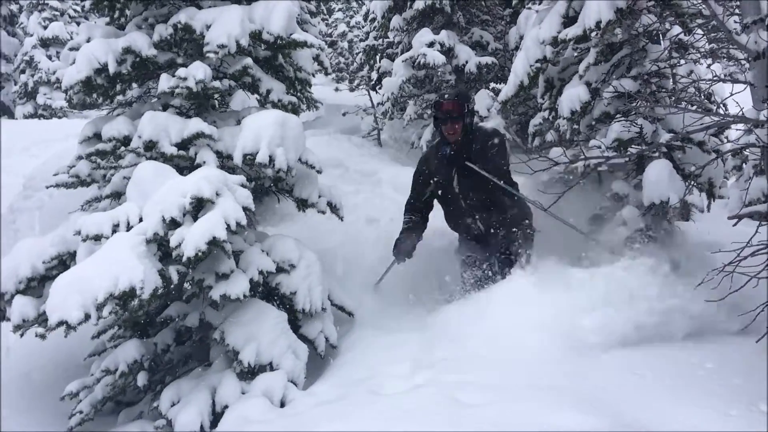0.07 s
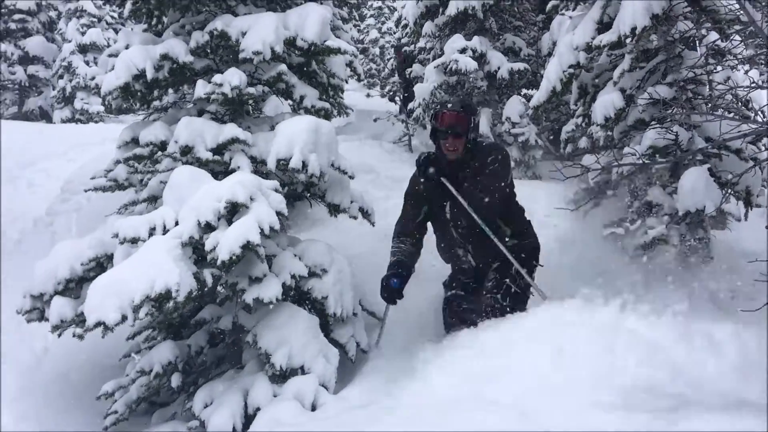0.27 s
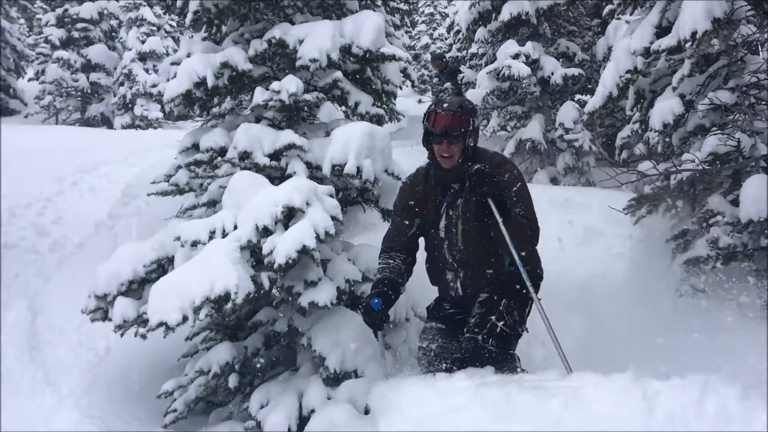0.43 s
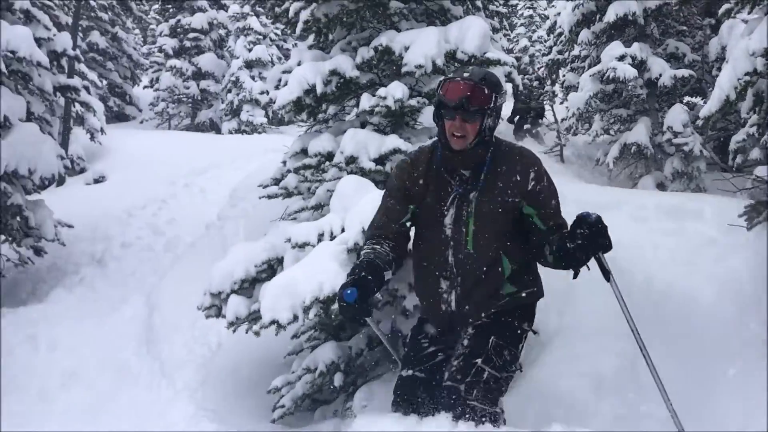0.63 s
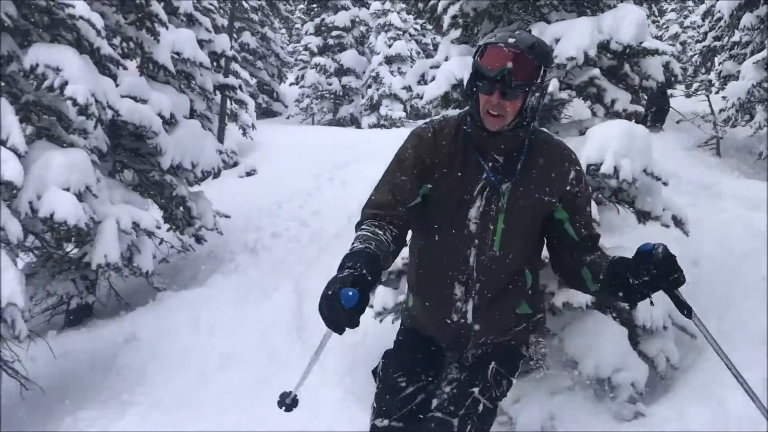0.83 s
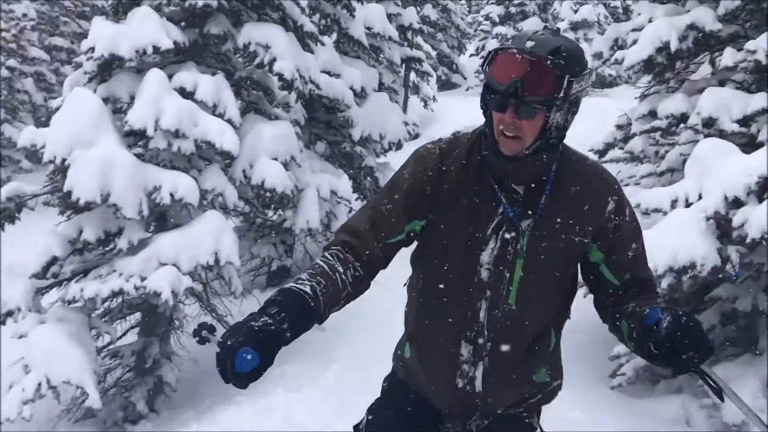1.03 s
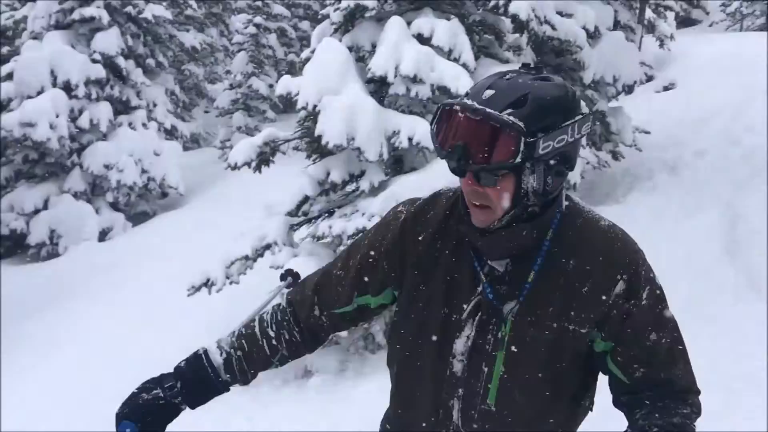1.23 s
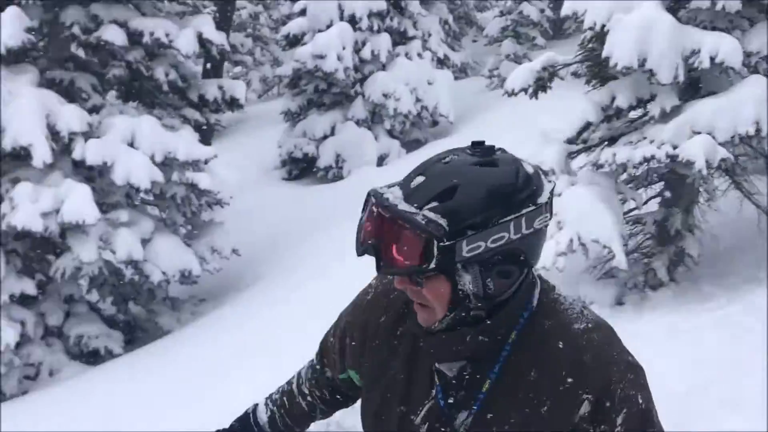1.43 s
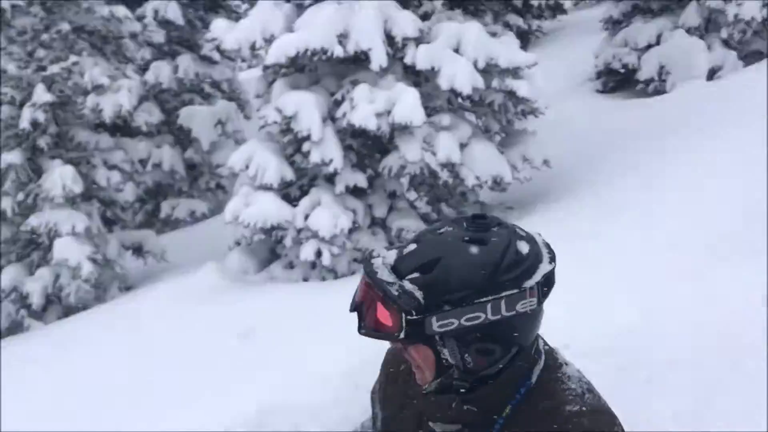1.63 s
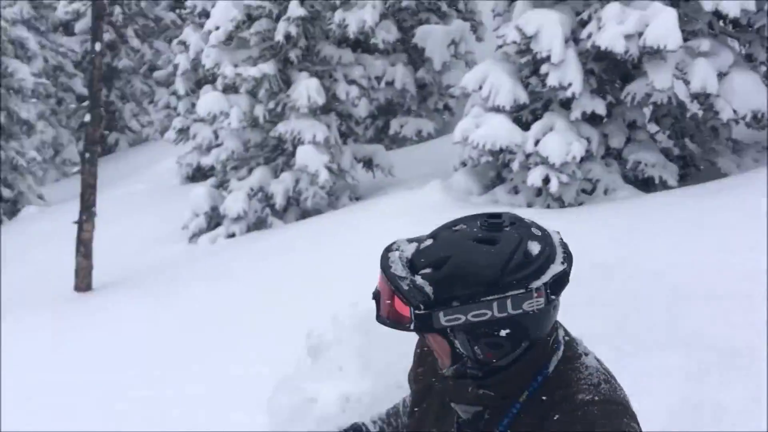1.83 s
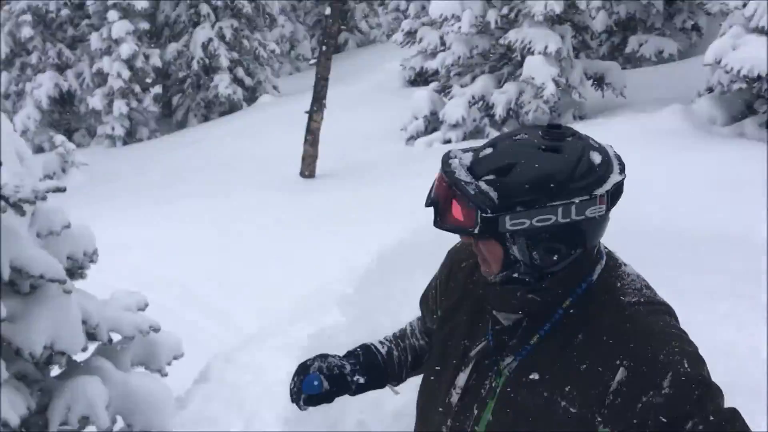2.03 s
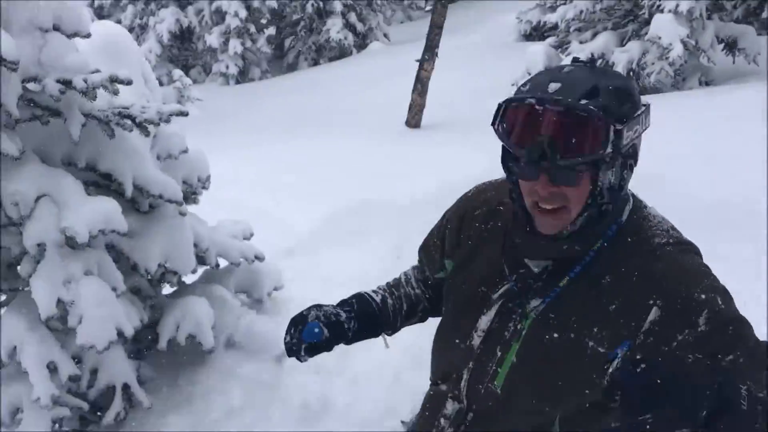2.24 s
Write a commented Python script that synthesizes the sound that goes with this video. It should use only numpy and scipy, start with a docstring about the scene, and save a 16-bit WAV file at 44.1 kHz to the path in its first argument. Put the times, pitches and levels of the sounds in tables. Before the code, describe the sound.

Skis swish and hiss through deep powder close by, with metallic gear clicks and low wind rumble

```python
"""Metal gear clicks, rattles and rings in the first half second, over hissing skis and wind rumble.
A skier then passes close in deep powder: swish, spray, short crunches, cracks and low thumps.
Skis, snow and wind are coloured noise and random grains under level curves; cracks are filtered clicks;
gear, poles and thumps are decaying sines, with noise rattles on the gear. No echoes; both channels alike."""
import sys
import numpy as np
from scipy import signal
from scipy.fft import rfft, irfft
from scipy.io import wavfile
from scipy.ndimage import uniform_filter1d

SR = 44100
rng = np.random.default_rng(int(sys.argv[2]) if len(sys.argv) > 2 else 0)


def generate_wav(signal):
    """Clip the signal to [-1, 1] and save it as 16-bit WAV at the path in sys.argv[1]."""
    frames = np.transpose(np.atleast_2d(signal))
    scaled = np.clip(frames, -1, 1) * 32767
    pcm = np.round(scaled).astype(np.int16)
    wavfile.write(sys.argv[1], SR, pcm)


N = 101429
TIME = np.arange(N) / SR


def from_db(db):
    """Decibels to gain."""
    return 10 ** (np.asarray(db) / 20)


def rms_one(x):
    """Scale to unit power."""
    return x / np.sqrt(np.mean(x ** 2) + 1e-20)


def in_time(rows):
    """Each column of a curve, joined by straight lines."""
    s, *columns = np.transpose(rows)
    return [np.interp(TIME, s, c) for c in columns]


def coloured(x, colour):
    """Filter to a spectrum, log-frequency interpolated and falling steeply outside it; unit power."""
    hz, db = np.transpose(colour)
    log_f = np.log(np.maximum(np.arange(N // 2 + 1) * SR / N, 1))
    below = np.maximum(np.log(hz[0]) - log_f, 0)
    above = np.maximum(log_f - np.log(hz[-1]), 0)
    gain_db = np.interp(log_f, np.log(hz), db) - 20 * (below + above)
    return rms_one(irfft(rfft(x) * from_db(gain_db), N))


def noise(colour):
    """Random noise with a spectrum; unit power."""
    return coloured(rng.standard_normal(N), colour)


def drift(corner_hz):
    """Slow random wander of unit power: white noise rolled off above the corner."""
    f = np.arange(N // 2 + 1) * SR / N
    spectrum = rfft(rng.standard_normal(N)) / (1 + (f / corner_hz) ** 2)
    return rms_one(irfft(spectrum, N))


def grains(per_s, spread_db):
    """Random clicks of either sign, mostly small and a few large."""
    size_db = spread_db * np.minimum(rng.exponential(1, N), 4)
    sizes = from_db(size_db) * rng.choice([-1, 1], N)
    return sizes * (rng.random(N) < per_s / SR)


def evened(x, span_s):
    """Take the slow swings out of a noise, so that a level curve alone sets them."""
    power = uniform_filter1d(x ** 2, max(int(span_s * SR), 2))
    return x / np.sqrt(power + 1e-3)


def band(x, order, centre_hz, width_octaves):
    """Band-pass around a centre, edges held below half the sample rate."""
    edges_hz = centre_hz * 2 ** (width_octaves * np.array([-.5, .5]))
    edges_hz = np.minimum(edges_hz, [SR / np.pi, SR / 2 - 1])
    return signal.sosfilt(signal.butter(order, edges_hz, "band", fs=SR, output="sos"), x + 1e-18)


def modes(table, age):
    """Decaying sines, struck at age zero."""
    return sum(from_db(db - 60 * age / t60) * np.sin(2 * np.pi * hz * age) for hz, db, t60 in table)


# gusts on the microphone: (time [s], level before trim and low-pass [dB])
WIND_GUSTS = [(0.0, -45), (0.02, -51.5), (0.13, -64), (0.15, -52), (0.46, -55.5), (0.79, -49), (0.81, -76),
              (0.84, -48.5), (1.01, -56), (1.11, -39.5), (1.14, -61), (1.17, -47), (1.38, -62.5),
              (1.43, -42.5), (1.55, -57), (1.59, -44), (1.61, -61), (1.67, -45), (1.73, -49.5), (1.81, -32),
              (1.87, -50), (2.02, -40), (2.07, -76), (2.1, -43), (2.15, -55), (2.2, -42), (2.3, -74)]
# wind spectrum: (frequency [Hz], relative level [dB])
WIND_COLOUR = [(22, -30), (36, -5), (48, -5.5), (72, -2), (100, -12), (140, -14.5), (250, -84)]
WIND_TRIM_DB, WIND_TOP_HZ = 1.5, 147


def wind():
    """Gusts buffet the microphone in low, rounded lumps: low-passed noise under a gust curve."""
    gust_db, = in_time(WIND_GUSTS)
    lumps = from_db(gust_db + WIND_TRIM_DB) * evened(noise(WIND_COLOUR), span_s=0.046)
    return signal.sosfilt(signal.butter(3, WIND_TOP_HZ, fs=SR, output="sos"), lumps)


# shivering metal spectrum: (frequency [Hz], relative level [dB])
SHIVER_COLOUR = [(6950, -30), (7150, 0), (7250, -12), (7350, 11), (7600, -30)]
SHIVER_PEAK_S, SHIVER_PEAK_DB, SHIVER_RISE_DB_PER_S, SHIVER_FALL_DB_PER_S = 1.85, -66, 55, 90


def shiver():
    """Bumps set the metal parts shivering: faint narrow-band noise that swells and fades."""
    rise_db = SHIVER_RISE_DB_PER_S * (SHIVER_PEAK_S - TIME)
    fall_db = SHIVER_FALL_DB_PER_S * (TIME - SHIVER_PEAK_S)
    level_db = SHIVER_PEAK_DB - np.maximum(rise_db, fall_db)
    return from_db(level_db) * evened(noise(SHIVER_COLOUR), span_s=0.041)


# knocks on the hollow poles: (time [s], level before mode levels [dB], pitch struck hardest [Hz])
POLE_KNOCKS = [(.1925, -40.5, 2400), (0.2296, -39, 1750), (0.2377, -40.5, 3330)]
# pole modes: (frequency [Hz], relative level [dB], t60 [s])
POLE_MODES = [(1370, -18, 0.034), (1750, -10, 0.025), (2400, 1, 0.02), (3330, -9, 0.055), (3490, -15, 0.06),
              (4370, -6, .016), (5980, -8, .02)]
KNOCK_FALL_DB_PER_OCTAVE = 4   # modes away from the struck pitch answer less


def poles():
    """A short hollow note under some of the taps; where the pole is hit decides which modes it favours."""
    out = np.zeros(N)
    for s, knock_db, struck_hz in POLE_KNOCKS:
        struck = []
        for hz, db, t60 in POLE_MODES:
            loss_db = KNOCK_FALL_DB_PER_OCTAVE * abs(np.log2(hz / struck_hz))
            struck.append((hz, db - loss_db, t60))
        out += from_db(knock_db) * modes(struck, np.maximum(TIME - s, 0))
    return out


# gear knocks: (time [s], snap impulse before band-pass [dB], rattle level [dB], rattle t60 [s],
# ring level before mode levels [dB], time until the ring is damped [s])
GEAR_TAPS = [(0.062, -42, -56, .03, -56, .008), (0.105, -27, -41, 0.021, -43, 0.032),
             (0.1178, -25, -55, 0.013, -46, 0.0087), (0.1917, -34, -45, 0.12, -54.5, 0.044),
             (0.2294, -7, -42, 0.06, -69, 0.015), (.2370, 8.5, -19, 0.026, -45, 0.017),
             (0.2558, 2, -22.5, 0.017, -33, 0.36), (0.3933, -28, -61, 0.027, -52, 0.0088),
             (0.455, -66, -70, .02, -55, 0.087)]
# rattle spectrum: (frequency [Hz], relative level [dB])
RATTLE_COLOUR = [(500, -27), (2000, -15.5), (4000, -10), (5200, -10.5), (6500, -11), (8200, -4.5),
                 (11200, -1), (12400, -6), (13300, -6), (15500, -9), (17000, 0)]
# small metal parts, close main modes that beat: (frequency [Hz], relative level [dB], t60 [s])
MAIN_RING = [(7098, -3, .42), (7164, -6, .32), (7213, 0, .17), (7375, -6, .12)]
# their faint overtones: (frequency [Hz], relative level [dB], t60 [s])
OVERTONES = [(8200, -13, 0.096), (9330, -14, .06), (10000, -22, 0.056), (11170, -21, .05),
             (13500, -16, 0.069)]
SNAP_HZ, SNAP_OCTAVES = 10870, 0.71
TAIL_RE_RATTLE_DB, TAIL_T60_S = -30, 0.45   # faint jingle that outlasts each rattle
RING_ATTACK_S, DAMPING_TIME_CONSTANT_S = 0.00069, 0.0023


def gear():
    """Each tap is a bright snap, a fast dying rattle and a beating ring that lasts until something damps it."""
    snaps, out, rattle = np.zeros(N), np.zeros(N), noise(RATTLE_COLOUR)
    for s, snap_db, rattle_db, rattle_t60, ring_db, free_s in GEAR_TAPS:
        age = np.maximum(TIME - s, 0)
        snaps[int(s * SR)] = from_db(snap_db)
        tail = from_db(TAIL_RE_RATTLE_DB - 60 * age / TAIL_T60_S)
        dying = from_db(-60 * age / rattle_t60) + tail
        out += (age > 0) * from_db(rattle_db) * dying * rattle
        attack = np.minimum(age / RING_ATTACK_S, 1)
        damping = np.exp(-np.maximum(age - free_s, 0) / DAMPING_TIME_CONSTANT_S)
        out += from_db(ring_db) * attack * damping * modes(MAIN_RING + OVERTONES, age)
    return out + band(snaps, 3, SNAP_HZ, SNAP_OCTAVES)


# bumps over firmer snow: (time [s], level before attack [dB], pitch [Hz], t60 [s])
THUMPS = [(1.652, -28, 155, .06), (1.678, -36, 211, .045), (1.726, -26.5, 292, 0.04),
          (1.7431, -26.5, 133, .06)]
THUMP_ATTACK_S = 0.0035


def thumps():
    """The skis bump over firmer snow: each bump is one low, decaying sine with a rounded start."""
    out = np.zeros(N)
    for s, db, hz, t60 in THUMPS:
        age = np.maximum(TIME - s, 0)
        out += np.minimum(age / THUMP_ATTACK_S, 1) * modes([(hz, db, t60)], age)
    return out


# cracks and clacks under the skis: (time [s], peak level [dB], centre [Hz], crumbling t60 [s])
CRACKS = [(0.2654, -32.5, 1140, 0.039), (.3022, -35.5, 540, .035), (0.3067, -32.5, 1140, 0.033),
          (0.3113, -38.5, 1340, 0.037), (0.319, -35, 2600, .04), (.486, -49, 1190, .015),
          (.541, -47, 1050, .012), (0.551, -50, 1400, 0.01), (0.5606, -39, 990, 0.014),
          (.584, -44.5, 1300, 0.033), (.7075, -35, 2470, 0.0092), (0.7103, -37, 1100, 0.056),
          (0.895, -43, 930, 0.01), (1.684, -41.5, 646, .05), (1.717, -36, 5280, .015),
          (1.726, -30, 656, .03), (1.7324, -27.5, 1390, .015), (1.7412, -32, 3300, 0.028),
          (2.19, -44.5, 550, 0.054)]
CRACK_OCTAVES, CRUMBLE_RE_CLICK_DB = 1.34, -21


def cracks():
    """Each crack is one sharp click in a broad resonance, with a short crumbling noise tail."""
    out, white = np.zeros(N), rng.standard_normal(N)
    for s, peak_db, hz, t60 in CRACKS:
        age = np.maximum(TIME - s, 0)
        burst = (TIME > s) * from_db(CRUMBLE_RE_CLICK_DB - 60 * age / t60) * white
        burst[int(s * SR)] = 1
        crack = band(burst, 2, hz, CRACK_OCTAVES)
        out += from_db(peak_db) * crack / np.abs(crack).max()
    return out


# spray spectrum: (frequency [Hz], relative level [dB])
SPRAY_COLOUR = [(2500, -4), (5000, -4.5), (6400, -0.5), (7800, -1.5), (9200, 1.5), (10600, -1.5),
                (11800, 3), (14000, 1.5), (15600, 1)]


def spray_hiss():
    """Fine hiss of thrown snow: bright noise of unit power."""
    return noise(SPRAY_COLOUR)


# snow packs and gives way: (time [s], length [s], grit level [dB], spray level [dB], thud level [dB])
CRUNCHES = [(0.103, 0.005, -49.5, -72, -67), (0.2636, 0.0043, -48.5, -60, -70),
            (0.2995, 0.015, -48, -42, -70), (0.519, 0.032, -69, -76, -54), (0.619, 0.011, -48.5, -58, -63),
            (1.063, 0.025, -75, -74, -54), (1.315, 0.0064, -74, -72, -57), (1.442, 0.027, -59, -75, -61),
            (1.654, 0.022, -56, -50.5, -49), (1.679, 0.038, -54, -61, -46), (1.718, 0.023, -41, -61, -44),
            (1.74, 0.0029, -45.5, -56, -47), (2.188, 0.012, -68, -72, -50.5)]
# breaking-grain spectrum: (frequency [Hz], relative level [dB])
CRUNCH_COLOUR = [(120, -28), (330, 1.5), (750, -7.5), (1200, 3), (1700, 0), (2500, -7), (3300, -4),
                 (4400, -18), (5800, -12.5), (7000, -23), (15000, -23)]
# dull thud spectrum: (frequency [Hz], relative level [dB])
THUD_COLOUR = [(80, 2), (170, 7), (330, -4), (500, -4), (900, -49), (1800, -32)]
CRUNCH_ATTACK_S, CRUNCH_RELEASE_TIME_CONSTANT_S = 0.0015, 0.0044
CRUNCH_GRAINS_PER_S, CRUNCH_UNEVEN_DB = 5000, 2.5   # the grains break in uneven bursts


def crunches():
    """Each crunch is a short dense run of breaking grains, with a puff of spray and a dull thud."""
    bursts = from_db(CRUNCH_UNEVEN_DB * drift(150))
    grit = coloured(bursts * grains(CRUNCH_GRAINS_PER_S, spread_db=3.0), CRUNCH_COLOUR)
    spray, thud, out = spray_hiss(), evened(noise(THUD_COLOUR), span_s=0.02), np.zeros(N)
    for s, length, grit_db, spray_db, thud_db in CRUNCHES:
        attack = np.clip((TIME - s) / CRUNCH_ATTACK_S, 0, 1)
        release = np.exp(-np.maximum(TIME - s - length, 0) / CRUNCH_RELEASE_TIME_CONSTANT_S)
        mix = from_db(grit_db) * grit + from_db(spray_db) * spray + from_db(thud_db) * thud
        out += attack * release * mix
    return out


# hollow band while the skier is close: (time [s], level [dB], centre before waver [Hz])
HOLLOW_BAND = [(0.5, -75, 1397), (1.05, -74, 1405), (1.2, -60.5, 1553), (1.55, -74, 1480),
               (1.85, -61, 1282), (2.0, -62.5, 1453), (2.15, -63, 1797), (2.3, -67, 1705)]
HOLLOW_WIDTH_HZ, HOLLOW_WAVER_OCTAVES = 68, .05


def hollow():
    """The snow rubs along the skis in a narrow resonance: slow noise on a gliding, wavering carrier."""
    level_db, centre_hz = in_time(HOLLOW_BAND)
    wavering_hz = centre_hz * 2 ** (HOLLOW_WAVER_OCTAVES * drift(6))
    phase = 2 * np.pi * np.cumsum(wavering_hz) / SR
    in_phase = drift(HOLLOW_WIDTH_HZ) * np.cos(phase)
    quadrature = drift(HOLLOW_WIDTH_HZ) * np.sin(phase)
    return from_db(level_db) * rms_one(in_phase + quadrature)


# brief level dips: (time [s], spray depth [dB], swish depth [dB])
DIPS = [(.36, 9, 11), (1.172, 11, 4), (1.853, 10, 12), (2.132, 11, 4)]
DIP_SIGMA_S = .006


def dip(times_s, depths_db):
    """Gain that drops for a few hundredths of a second at each dip, Gaussian in dB."""
    loss_db = sum(db * np.exp(-.5 * ((TIME - s) / DIP_SIGMA_S) ** 2) for s, db in zip(times_s, depths_db))
    return from_db(-loss_db)


# skis in the snow: (time [s], spray level before trim [dB], swish level before trim [dB])
GLIDE = [(0, -51, -61.5), (0.09, -59, -59.5), (0.48, -62, -63.5), (0.62, -59, -57), (0.72, -51.5, -53.5),
         (0.82, -58.5, -58), (1.02, -60, -60.5), (1.29, -55.5, -54), (1.58, -54.5, -55.5),
         (1.68, -53.5, -54.5), (1.82, -54, -53), (2.05, -62.5, -57.5), (2.3, -63, -56)]
# low rush of snow pushed aside: (time [s], level [dB])
PUSH = [(0, -56.5), (0.12, -60), (0.3, -53), (0.45, -58), (0.6, -52.5), (1.0, -57.5), (1.17, -51),
        (1.44, -52.5), (1.62, -52), (1.67, -44.5), (1.74, -42.5), (1.86, -51.5), (2.3, -52.5)]
# swish spectrum: (frequency [Hz], relative level [dB])
SWISH_COLOUR = [(200, -31), (450, -1), (750, -3.5), (1050, 0), (1500, 0.5), (1950, -1), (2700, -3),
                (3400, -2), (4800, -7.5), (9000, -13)]
# breaking-clump spectrum: (frequency [Hz], relative level [dB])
CLUMP_COLOUR = [(150, -15), (400, 3), (800, 0.5), (1400, 1), (2500, -16), (5000, -9), (10000, -19)]
# pushed-snow spectrum: (frequency [Hz], relative level [dB])
PUSH_COLOUR = [(60, -58), (110, -1.5), (150, 2), (210, -7.5), (300, -13.5), (450, -20.5), (900, -24)]
SPRAY_TRIM_DB, SWISH_TRIM_DB = 2, -0.73
CLUMPS_PER_S, CLUMP_RE_SWISH_DB, CLUMP_SPREAD_DB = 170, -8.5, 4.5


def skis():
    """Swish with crumbling clumps, a fine hiss of spray, and the low rush of pushed snow."""
    spray_db, swish_db = in_time(GLIDE)
    push_db, = in_time(PUSH)
    dip_s, spray_dips, swish_dips = np.transpose(DIPS)
    spray = from_db(spray_db + SPRAY_TRIM_DB + .5 * drift(25)) * spray_hiss()
    clumps = from_db(CLUMP_RE_SWISH_DB) * coloured(grains(CLUMPS_PER_S, CLUMP_SPREAD_DB), CLUMP_COLOUR)
    swish_gain = from_db(swish_db + SWISH_TRIM_DB + 1.22 * drift(19))
    swish = swish_gain * (noise(SWISH_COLOUR) + clumps)
    push = from_db(push_db) * evened(noise(PUSH_COLOUR), span_s=0.065)
    return dip(dip_s, spray_dips) * spray + dip(dip_s, swish_dips) * swish + push


def scene():
    """Everything reaches one microphone, the same in both channels."""
    background = wind() + shiver()
    metal = poles() + gear()
    snow = thumps() + cracks() + crunches() + hollow() + skis()
    mono = background + metal + snow
    return np.array([mono, mono])


MIC_LOW_CUT_HZ, TOP_CUT_HZ = 37, 15700


def record(dry):
    """The microphone loses the deepest bass; the top is cut steeply."""
    thinned = signal.sosfilt(signal.butter(3, MIC_LOW_CUT_HZ, "high", fs=SR, output="sos"), dry)
    return signal.sosfilt(signal.ellip(10, .2, 70, TOP_CUT_HZ, fs=SR, output="sos"), thinned)


dry = scene()
out = record(dry)
generate_wav(out)
```